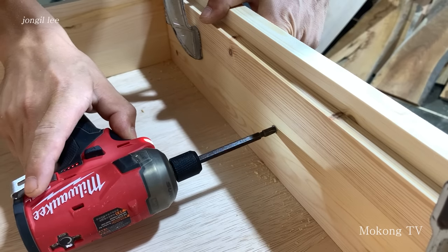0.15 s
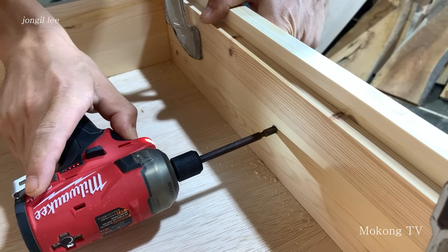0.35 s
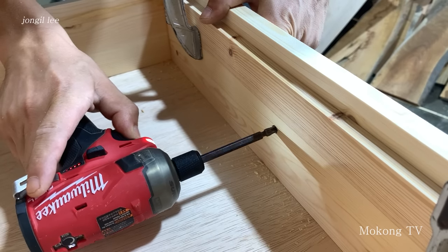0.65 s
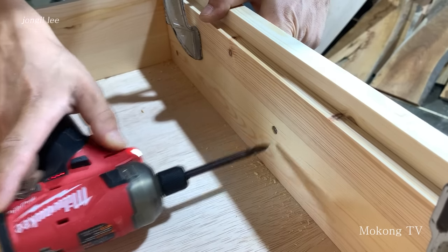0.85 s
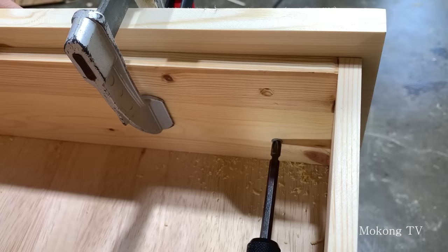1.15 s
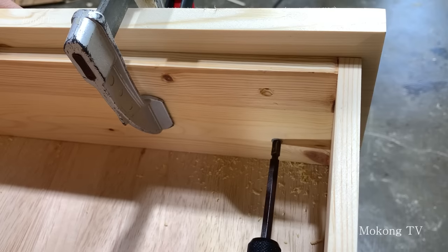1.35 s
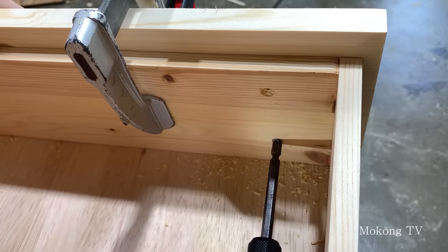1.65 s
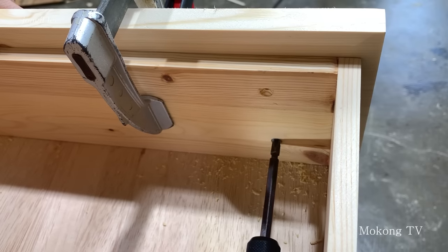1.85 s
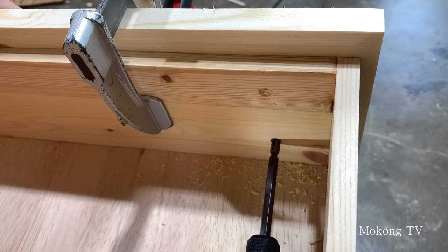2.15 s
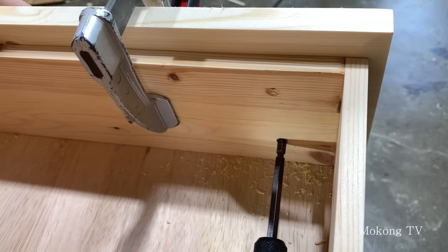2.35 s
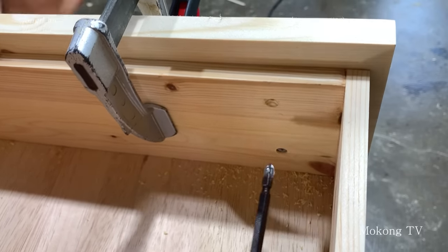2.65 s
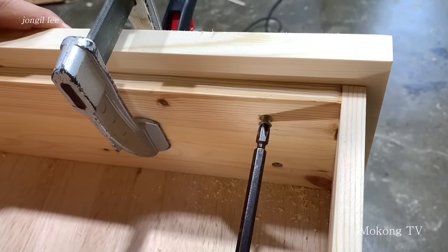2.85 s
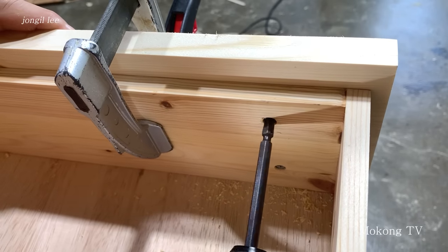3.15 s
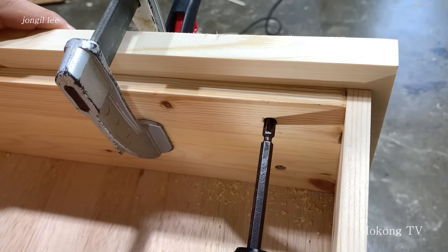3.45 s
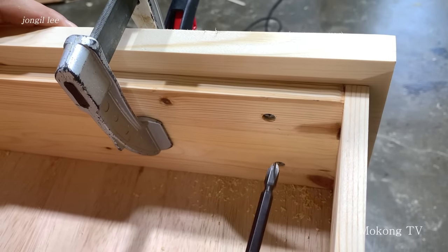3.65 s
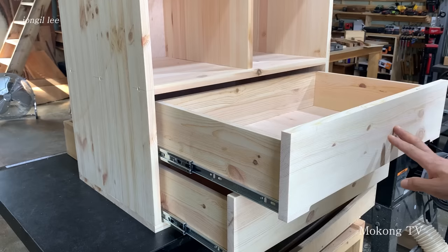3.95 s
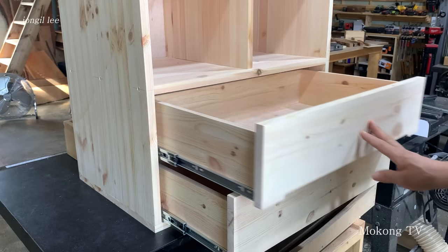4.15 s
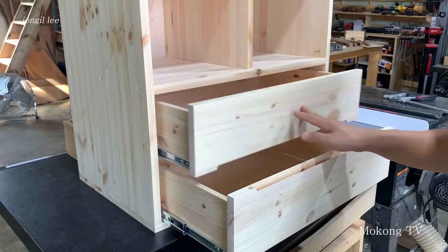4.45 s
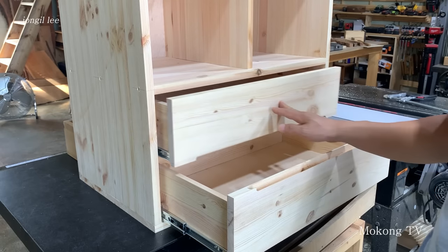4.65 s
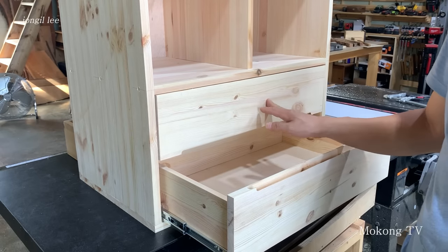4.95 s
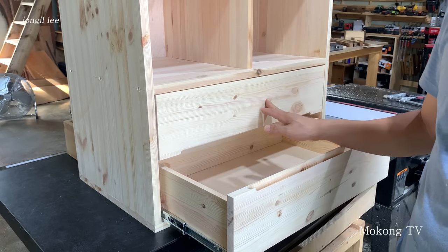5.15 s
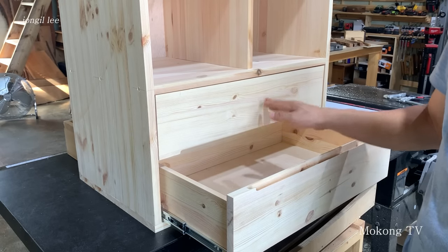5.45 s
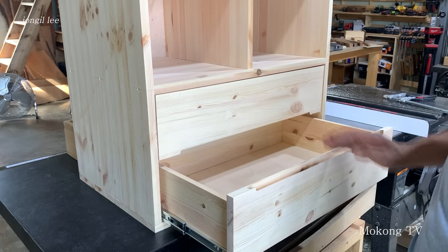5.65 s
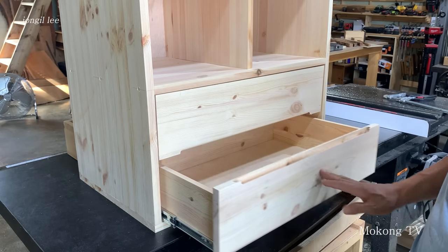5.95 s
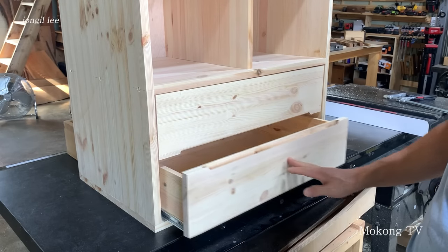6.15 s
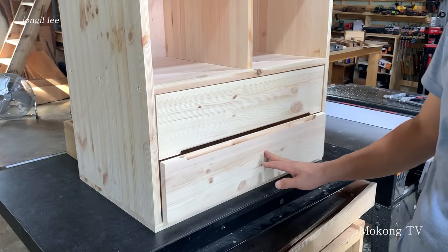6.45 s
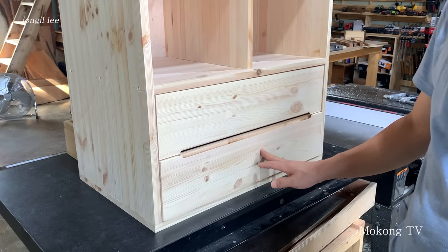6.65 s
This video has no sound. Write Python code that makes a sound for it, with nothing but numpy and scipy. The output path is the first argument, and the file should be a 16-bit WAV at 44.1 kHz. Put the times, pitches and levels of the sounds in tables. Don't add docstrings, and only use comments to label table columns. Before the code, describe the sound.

Rapid wooden hammering and motor whirr in three short bursts, then drawers rumble and hiss closed on ball-bearing slides in a workshop.

```python
import sys
import numpy as np
from scipy import signal
from scipy.fft import rfft, irfft, next_fast_len
from scipy.io import wavfile
from scipy.ndimage import uniform_filter1d, map_coordinates

SR = 44100
rng = np.random.default_rng(int(sys.argv[2]) if len(sys.argv) > 2 else 0)


def generate_wav(signal):
    frames = np.transpose(np.atleast_2d(signal))
    scaled = np.clip(frames, -1, 1) * 32767
    pcm = np.round(scaled).astype(np.int16)
    wavfile.write(sys.argv[1], SR, pcm)


def to_linear_factor(level_db):
    exponent = np.asarray(level_db, float) / 20
    return 10 ** exponent


N = 299880
T = np.arange(N) / SR

# (start [s], end [s])
VIEWS = [
    (0, 1.1635),
    (1.1635, 2.777),
    (2.777, 3.985),
    (3.985, 6.8),
]
# (frequency [Hz], density [dB per Hz])
AIR_SPECTRUM = [(15, -63), (25, -32), (58, 5.5), (96, -8.5), (212, -19.5), (303, -12), (545, -19),
                (588, -15), (635, -19.5), (1200, -27), (3080, -38), (8530, -46), (11000, -45), (14300, -65),
                (22000, -120)]
# (frequency [Hz], time to fall 60 dB [s])
DECAY_TIMES = [(80, 1), (300, 0.32), (2000, 0.65), (6000, 0.6), (14000, 0.26)]

# (time [s], rumble level [dB])
ROLLING = [
    [(4.02, -64), (4.09, -60.5), (4.17, -47), (4.25, -47.5), (4.33, -43), (4.45, -45), (4.6, -52),
     (4.92, -60), (5.05, -81.5)],
    [(5.85, -70), (5.93, -56), (6.1, -49.5), (6.16, -43), (6.33, -57.5), (6.45, -57), (6.65, -71)],
]
# (frequency [Hz], density [dB per Hz])
RUMBLE_SPECTRUM = [(47, -36.5), (80, -12), (144, -45), (179, 2.5), (222, -11.5), (305, -8), (444, -2.5),
                   (746, -14), (1510, -20.5), (2500, -75), (3250, -40), (5500, -120)]
# (frequency [Hz], density [dB per Hz])
BALL_SPECTRUM = [(700, -25), (1500, 5.5), (3000, -8), (6000, -20), (12000, -31)]
FULL_ROLL_DB = -44
HISS_DB, HISS_GROWS = -57.5, 1.48

# (start [s], end [s], end pitch over start pitch [ratio])
MOTOR_STAGES = [
    (0, .74, .999),
    (1.158, 2.03, .998),
    (2.03, 2.21, .968),
    (2.785, 2.87, .878),
    (2.79, 2.83, 1.048),
    (2.89, 3.02, .995),
    (3.01, 3.25, .99),
]
# (start pitch [Hz], width [Hz], level [dB])
MOTOR_TONES = [
    [(8618, 14, -49), (9900, 90, -48), (4140, 80, -45.5), (4900, 60, -50), (9277, 15, -58),
     (6280, 90, -49.5)],
    [(9665, 30, -47.5), (8940, 70, -53.5), (9285, 15, -70)],
    [(8740, 120, -45), (5180, 120, -41)],
    [(9350, 36, -39.5)],
    [(9300, 40, -49.5)],
    [(6920, 70, -36), (10330, 250, -44), (8620, 70, -46)],
    [(5130, 120, -41), (6380, 90, -39)],
]
# (time [s], length [s], start pitch [Hz], level [dB])
SCRAPE_EVENTS = [
    (2.47, .13, 11000, -68),
    (6.215, .13, 3100, -63),
    (4.46, .12, 6000, -71),
]
SCRAPE_FALL, SCRAPE_WIDTH = .84, .4
# (time [s], length [s], start pitch [Hz], end pitch [Hz], level [dB])
SINGING_TONES = [
    (5.853, .193, 4530, 4640, -81),
    (6.03, .182, 4640, 4420, -79),
    (4, 2.8, 8500, 8620, -93),
    (3.985, 2.015, 10400, 10440, -92),
]
SINGING_WIDTH_HZ = 200

# (frequency [Hz], width [Hz], level [dB])
CABINET_MODES = [(63.6, 5.8, 15.5), (95.4, 7.7, 17.5), (178, 22, 7), (260, 37, -0.5), (300, 17, 1),
                 (444, 180, -4.5), (586, 120, -4.5), (1030, 220, -10.5)]
# (time [s], thud level [dB], thud pitch [Hz], crack level [dB])
DULL_BUMPS = [(.012, -7, 170, -67), (0.792, -20, 189, -68.5), (.819, -50, 400, -54), (2.4913, -24, 92, -46),
              (2.572, -39, 256, -44), (3.257, -2.5, 160, -71), (3.279, -15, 165, -71.5),
              (3.518, -33.5, 170, -42), (3.711, -46, 149, -61), (3.814, -45.5, 200, -50),
              (3.8493, -47, 350, -64.5), (4.7123, -40, 450, -66), (5.2599, -27, 260, -48.5),
              (5.2884, -39.5, 300, -51)]
BUMP_CRACK_HZ, BUMP_CLICK_DB = 1400, -19.5
# (time [s], thud level [dB], thud pitch [Hz], crack level [dB], crack pitch [Hz])
STEEL_TAPS = [(0.8589, -24.5, 365, -27.5, 1390), (0.964, -69, 300, -48.5, 3000),
              (2.4515, -25.5, 223, -23.5, 1480), (2.695, -56, 300, -58, 6500),
              (2.7785, -32.5, 187, -57, 4196), (3.5917, -27.5, 150.3, -46, 6000),
              (3.6103, -29.5, 137, -50, 2000), (3.9972, -59, 197.5, -39, 3230),
              (4.041, -50, 201, -47, 4010), (4.345, -25.5, 189, -47.5, 5000),
              (4.4543, -24.5, 430, -39.5, 2650), (4.5103, -34, 449, -50, 1200),
              (6.1659, -34, 260, -61, 1200), (6.2071, -32, 282, -42.5, 2860), (6.25, -38, 400, -53, 2690)]
# (crack pitch [Hz], click over crack [dB])
TOOL_CLICKS = [(1500, -6.5), (6500, 1)]
# (crack pitch [Hz], click over crack [dB])
CABINET_CLICKS = [(1200, 3.5), (5000, -9)]

# (first blow [s], period [s], blows [count])
BLOW_RUNS = [
    [(.001, .039, 2), (.086, .0315, 2), (.149, .0286, 1), (.1785, .0309, 17), (.706, .03, 1)],
    [(1.1635, .0535, 4), (1.3765, .05175, 13), (2.038, .026, 1), (2.0635, .02508, 7), (2.248, .03, 1)],
    [(2.844, .063, 2), (2.945, .035, 2), (3.010, .024, 2), (3.0555, .02195, 8), (3.233, .031, 2)],
]
# (time [s], blow into wood [dB], motor level [dB])
EFFORT = [
    [(0, -29, -36.5), (.1, -17, -38), (.27, -18, -35), (.55, -16.5, -37), (.68, -15, -37),
     (.72, -22, -42.5), (.75, -37.5, -44)],
    [(1.1635, -24.5, -40), (1.28, -21.5, -40), (1.4, -17, -41), (2.02, -15, -41), (2.05, -13, -33.5),
     (2.12, -13.5, -31), (2.22, -12.5, -32.5), (2.262, -19.5, -39.5), (2.29, -17, -60)],
    [(2.78, -44, -67), (2.8, -34.5, -38.5), (2.86, -32, -29), (2.89, -30, -34.5), (3.0, -20.5, -33.5),
     (3.05, -15, -35), (3.15, -13.5, -33), (3.27, -16, -37), (3.31, -22.5, -54)],
]
# (frequency [Hz], width [Hz], level [dB])
BOARD_MODES = [
    [(160, 56, -5.5), (258, 110, -15), (385, 64, -3), (460, 80, -1), (640, 110, -7), (826, 180, -8),
     (942, 210, -10), (1262, 61, -10), (1894, 330, -22.5), (2860, 880, -26.5)],
    [(164.5, 45, 5.5), (260, 22, -12), (344.7, 56, 2.5), (513, 87, 2.5), (664, 95, -4.5), (810, 170, -5.5),
     (1110, 150, -6), (1290, 210, -10), (1950, 640, -19.5), (2730, 790, -23.5)],
    [(170, 46, 2), (260, 26, -11.5), (360, 120, -4.5), (468, 100, -1), (710, 100, -8), (895, 200, -10),
     (1200, 200, -19.5), (1266, 290, -9), (1763, 690, -20)],
]
# (frequency [Hz], width [Hz], level [dB])
PANEL_MODES = [
    [(130.87, 1.84, 10), (97, 2.9, 3), (63.84, 8, -8), (185.9, 11, -4)],
    [(76, 11, 5), (176.9, 5.7, 4)],
    [(170.05, 2.6, -4), (1028, 1.7, -6), (90, 10, -4.5), (140, 4.2, 4.5)],
]
# (bite [dB], thump [dB], rebound [dB])
BLOW_FORCES = [
    (-6, 0, -13.5),
    (-6.5, -2, -4),
    (-4, -4.5, -9.5),
]
# (bite lag [s], thump lag [s], rebound lag [s], shudder length [s], tightening [per s])
BLOW_TIMING = [
    (.001, .0065, .0112, .014, .04),
    (0, .0118, .0162, .013, .22),
    (.002, .009, .0135, .017, .1),
]
BITE_DIRECTION = [1, -1, -1]
# (start level [dB], growth [dB per s])
SHUDDER_GROWTH = [
    (0, 2),
    (0.5, 3),
    (1.5, 4),
]
# (frequency [Hz], density [dB per Hz])
RATTLE_SPECTRUM = [(500, -17.5), (1000, -0.5), (2000, -1), (3000, -2), (4500, 0.5), (7000, -4),
                   (10000, -3.5), (12000, -10), (15000, -7), (16500, -7.5)]
# (start level [dB], growth [dB per s], share of the blow [ratio], share of the motor [ratio])
RATTLE_CONTROL = [
    (-45.5, 11, 0.16, .4),
    (-53.5, 14, .1, 1),
    (-36, -1, 0.36, 0.13),
]
# (frequency [Hz], density [dB per Hz])
WHIRR_SPECTRA = [
    [(880, -27), (1500, -8.5), (2060, -8), (2740, -17.5), (3310, -9), (4240, -3.5), (4730, -9), (6310, -10),
     (7030, -21.5), (8830, -8), (9100, -27), (10200, -16), (16000, -22.5)],
    [(880, -20.5), (1500, -4.5), (1760, -5.5), (2370, -8.5), (2940, -9), (4240, -3.5), (4640, -9),
     (5380, -3.5), (8160, -20.5), (9650, -13.5), (10100, -17.5), (14900, -27.5), (16000, -31)],
    [(880, -32.5), (1500, -1), (1790, -4.5), (2440, -19.5), (3840, 3), (4640, -1.5), (6630, -1), (8830, -9),
     (9190, -12.5), (10100, -9), (11500, -13.5), (14300, -27.5), (16000, -26.5)],
]
# (level over motor [dB], share of the blow [ratio])
DRONE_CONTROL = [
    (9, -.1),
    (10.5, -.1),
    (17.5, .62),
]
FULL_BLOW_DB, FULL_MOTOR_DB = -16, -36
FRESH_CHANCE = .3


def unit(x):
    return x / np.sqrt(np.mean(x ** 2) + 1e-20)


def along(points, hz):
    f, v = np.transpose(points)
    return np.interp(np.log(hz + 1), np.log(f + 1), v)


def gains(rows):
    s, *columns = np.transpose(rows)
    inside = (T >= s[0]) & (T < s[-1])
    return [to_linear_factor(np.interp(T, s, column)) * inside for column in columns]


def filtered(x, response):
    n = np.shape(x)[-1]
    m = next_fast_len(n + SR)
    return irfft(rfft(x, m) * response(np.fft.rfftfreq(m, 1 / SR)), m)[..., :n]


def body(x, modes):
    def response(f):
        total = 0
        for k, (centre, width, db) in enumerate(sorted(modes)):
            damping = 1j * f * width
            total = total + (-1) ** k * to_linear_factor(db) * damping / (centre * centre - f * f + damping)
        return total
    return filtered(x, response)


def band(x, hz, width):
    return unit(filtered(x, lambda f: (1j * f * hz / (hz * hz - f * f + 1j * width * f * hz)) ** 2))


def noise(spectrum):
    return unit(filtered(rng.standard_normal(N), lambda hz: to_linear_factor(along(spectrum, hz))))


def wobble(rate):
    return map_coordinates(rng.standard_normal(int(N * rate / SR) + 4), [T * rate])


def add(track, s, sound):
    part = track[round(s * SR):][:len(sound)]
    part += sound[:len(part)]


def air():
    return to_linear_factor(-58.5 + 1.7 * wobble(1.6)) * noise(AIR_SPECTRUM)


def room(x, wet_db):
    hz, t, z = signal.stft(rng.standard_normal(SR), SR, nperseg=256)
    decay = to_linear_factor(-60 * t / along(DECAY_TIMES, hz)[:, None])
    tail = signal.istft(z * decay, SR, nperseg=256)[1]
    tail = np.pad(tail / np.linalg.norm(tail), (300, 0))
    return x + to_linear_factor(wet_db) * signal.fftconvolve(x, tail)[:N]


def slides():
    drawers = []
    for drawer in ROLLING:
        rows = [(s, db, HISS_DB + HISS_GROWS * (db - FULL_ROLL_DB)) for s, db in drawer]
        drawers.append(gains(rows))
    rumble_gain, hiss_gain = [sum(pair) for pair in zip(*drawers)]
    rumble = unit(to_linear_factor(1.8 * wobble(45)) * noise(RUMBLE_SPECTRUM))
    hiss = unit(to_linear_factor(3.4 * wobble(120)) * noise(BALL_SPECTRUM))
    return to_linear_factor(-1.0) * rumble_gain * rumble + to_linear_factor(-2.0) * hiss_gain * hiss


def whine_rows():
    rows = []
    for (t0, t1, glide), tones in zip(MOTOR_STAGES, MOTOR_TONES):
        rows += [(t0, t1, hz, glide * hz, width, db) for hz, width, db in tones]
    for s, length, hz, db in SCRAPE_EVENTS:
        rows.append((s, s + length, hz, SCRAPE_FALL * hz, SCRAPE_WIDTH * hz, db))
    for s, length, hz0, hz1, db in SINGING_TONES:
        rows.append((s, s + length, hz0, hz1, SINGING_WIDTH_HZ, db))
    return rows


def whines():
    out = np.zeros(N)
    for t0, t1, hz0, hz1, width, db in whine_rows():
        n = round((t1 - t0) * SR)
        knots = np.tile(np.arange(n) * width / SR, (2, 1))
        rows = np.repeat([[0], [1]], n, 1)
        pitch_drift, level_drift = map_coordinates(rng.standard_normal((2, 1500)), [rows, knots])
        phase = 2 * np.pi * np.cumsum(np.linspace(hz0, hz1, n) + .5 * width * pitch_drift) / SR
        level = to_linear_factor(db + 3 + 3.1 * level_drift) * signal.windows.tukey(n, .06)
        add(out, t0, level * np.sin(phase))
    return out


def contacts(click):
    bumps = [(s, crack, thud, crack + BUMP_CLICK_DB, BUMP_CRACK_HZ, low)
             for s, thud, low, crack in DULL_BUMPS]
    taps = [(s, crack, thud, crack + along(click, hz), hz, low)
            for s, thud, low, crack, hz in STEEL_TAPS]
    return sorted(bumps + taps)


def knocks(shot, modes, click, top_hz):
    thuds, cracks, clicks = np.zeros((3, N))
    t = T[:SR // 8]
    for s, crack_db, thud_db, click_db, hz, low_hz in contacts(click):
        if shot[round(s * SR)]:
            grit, pad = rng.standard_normal((2, len(t)))
            thud_level = to_linear_factor(thud_db + 3.5 - 60 * t / 0.091) * (1 - np.exp(-t * low_hz / 0.44))
            crack_level = to_linear_factor(crack_db - 8.0 - 60 * t / 0.12) * (1 - np.exp(-t / 0.0017))
            add(thuds, s, thud_level * band(pad, low_hz, width=1.2))
            add(cracks, s, crack_level * band(grit, hz, width=1.0))
            add(clicks, s, to_linear_factor(click_db - 5 - 60 * t / 0.017) * (1 - np.exp(-t / .001)))
    click_noise = noise([(4000, -40), (6500, 0), (top_hz, -1.5), (1.1 * top_hz, -22)])
    return body(thuds, modes) + cracks + clicks * click_noise


def layers(screw):
    s, blow, motor = np.transpose(EFFORT[screw])
    start_db, growth, of_blow, of_motor = RATTLE_CONTROL[screw]
    drone_db, share = DRONE_CONTROL[screw]
    extra_blow = blow - FULL_BLOW_DB
    rattle = start_db + growth * (s - s[0]) + of_blow * extra_blow + of_motor * (motor - FULL_MOTOR_DB)
    drone = motor + drone_db + share * extra_blow
    return gains(np.transpose([s, blow, rattle, motor, drone]))


def hammer(screw):
    *lags, length, tighten = BLOW_TIMING[screw]
    times = [s + k * period for s, period, count in BLOW_RUNS[screw] for k in range(count)]
    swell = np.hanning(round(length * SR)) ** 0.33
    push = np.hanning(round(0.0015 * SR))
    habit = rng.standard_normal(SR // 20)
    start_db, growth = SHUDDER_GROWTH[screw]
    signs = (BITE_DIRECTION[screw], 1, 1)
    shudder, thump, gate = np.zeros((3, N))
    for s, luck in zip(times, rng.standard_normal((len(times), SR // 20))):
        elapsed = s - times[0]
        quicker = np.arange(len(swell)) * (1 + tighten * elapsed)
        motion = habit[quicker.astype(int)] + FRESH_CHANCE * luck[:len(swell)]
        add(shudder, s, swell * motion * to_linear_factor(0.45 * luck[-1] + start_db + growth * elapsed))
        for lag, db, sign in zip(lags, BLOW_FORCES[screw], signs):
            add(thump, s + lag, sign * to_linear_factor(db + .7 * luck[-3]) * push)
        add(gate, s, swell * to_linear_factor(2 * luck[-2]))
    return shudder, thump, gate


def driver(screw):
    wood, rattle, whirr, drone = layers(screw)
    shudder, thump, gate = hammer(screw)
    on = wood > 0
    pace = np.sqrt(np.abs(uniform_filter1d(gate ** 2, SR // 10)) / np.mean(gate[on] ** 2) + 0.059)
    stiff_shudder = filtered(shudder, lambda f: 1j * f / (450 + 1j * f))
    force = (stiff_shudder + thump) / pace
    shaking = rng.standard_normal(N)
    modes = BOARD_MODES[screw] + PANEL_MODES[screw]
    blows, even, shake, steady = body([force * wood, force, drone * shaking, shaking], modes)
    chatter = gate / pace * to_linear_factor(3.0 * wobble(600)) * noise(RATTLE_SPECTRUM)
    hiss = whirr * to_linear_factor(1.5 * wobble(60)) * noise(WHIRR_SPECTRA[screw])
    wooden = to_linear_factor(-3.5) * blows / even[on].std() + to_linear_factor(-3.0) * shake / steady.std()
    return wooden + to_linear_factor(8) * rattle * chatter / chatter[on].std() + to_linear_factor(3.5) * hiss


def scene():
    steady = whines() + slides()
    out = air()
    for k, ((t0, t1), wet_db) in enumerate(zip(VIEWS, [-10.5, -9.5, -12.5, -5.5])):
        shot = (T >= t0) & (T < t1)
        if k < len(BLOW_RUNS):
            modes = BOARD_MODES[k] + PANEL_MODES[k]
            near = driver(k) + knocks(shot, modes, TOOL_CLICKS, top_hz=15000)
        else:
            near = knocks(shot, CABINET_MODES, CABINET_CLICKS, top_hz=8500)
        out = out + shot * room(shot * steady + near, wet_db)
    return out[None]


def roll_off(x):
    return signal.sosfilt(signal.butter(12, 16500, fs=SR, output="sos"), x)


def record(dry):
    def response(f):
        bass_loss = (1j * f / (34 + 1j * f)) ** 4
        return bass_loss * np.clip((15950 - f) / 250, 0, 1) ** 2
    x = filtered(dry[0], response)[None]
    x = x / (1 + np.abs(x / .68) ** 4) ** (1 / 4)
    return roll_off(x)


dry = scene()
out = record(dry)
generate_wav(out)
```